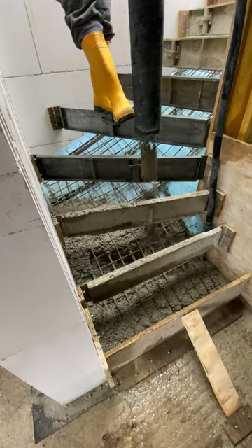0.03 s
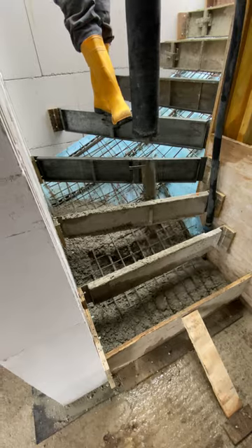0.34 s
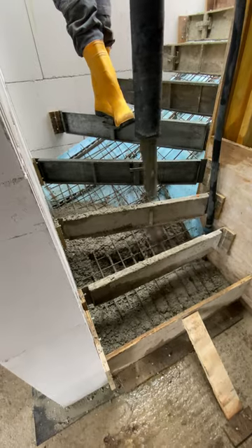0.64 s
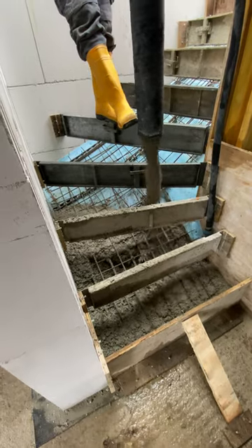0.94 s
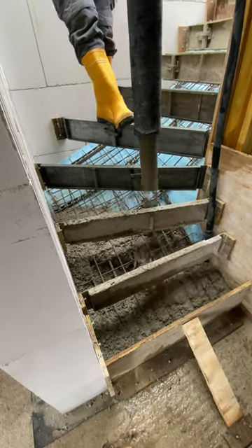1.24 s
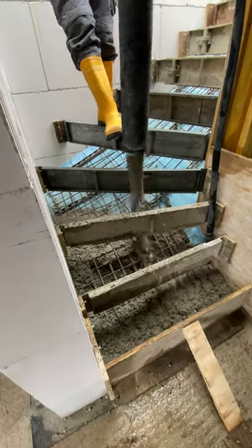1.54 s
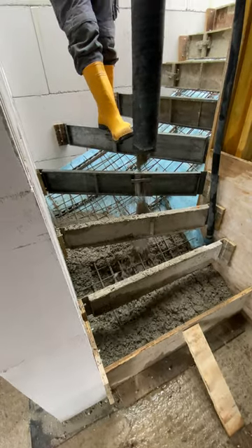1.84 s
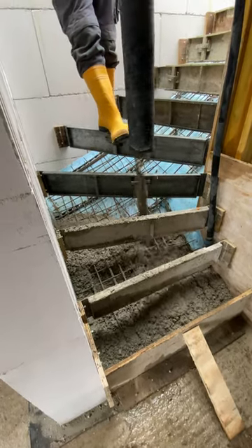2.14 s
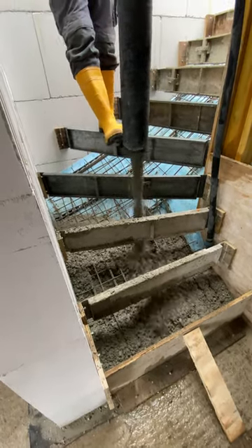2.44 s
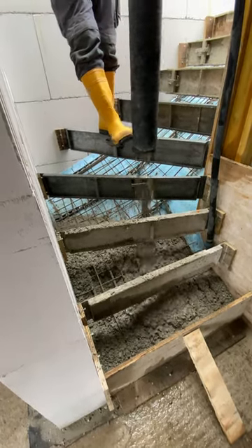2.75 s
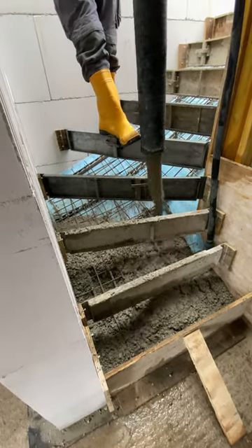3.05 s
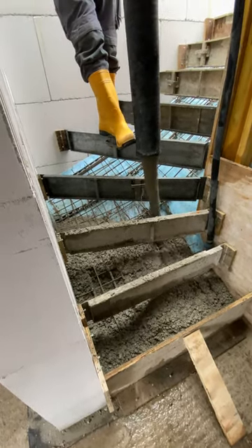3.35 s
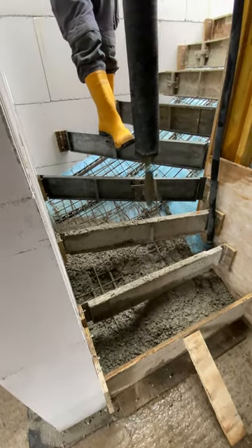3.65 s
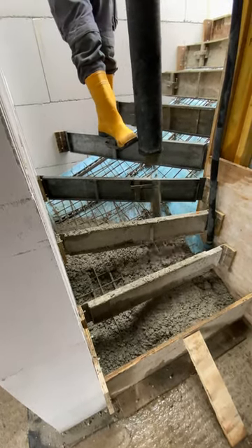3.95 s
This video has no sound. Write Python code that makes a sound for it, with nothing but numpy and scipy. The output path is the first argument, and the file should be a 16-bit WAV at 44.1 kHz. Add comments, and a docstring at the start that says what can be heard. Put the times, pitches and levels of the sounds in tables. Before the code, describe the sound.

Wet concrete pours from a hose throughout, hissing and spattering close by in uneven spurts, with gravel ticking on steel, small squelches and a distant pump drone. Lumps plop from about 0.7 seconds, and a surge lands with a falling gulp at 1.3 seconds. The last heavy lumps drop near 2.1 seconds. The stream continues slightly weaker, faltering briefly around 3.7 seconds.

```python
"""A bare stairwell, two microphones on a hose that shoots wet concrete into a stair's formwork.
From the start the pump's engine drones outside and the stream hisses, spatters, breaks and spurts;
gravel ticks on the mesh, bubbles squelch and rushing air rings the hose. Lumps plop into the fill,
and at 1.3 s the main surge digs in with a falling gulp. The last heavy lumps land near 2.1 s;
the stream runs on a little weaker, with its deepest break just before the end."""
import sys
import numpy as np
from scipy import signal
from scipy.fft import rfft, irfft
from scipy.io import wavfile

SR = 44100
rng = np.random.default_rng(int(sys.argv[2]) if len(sys.argv) > 2 else 0)


def inscribe(sig):
    """Save sig as 16-bit PCM at rate SR to the path in sys.argv[1].

    A 1-D sig is mono; a 2-D sig holds one channel per row.
    Samples are clipped to [-1, 1] before scaling.
    """
    pcm = np.round(np.clip(np.atleast_2d(sig).T, -1, 1) * 32767)
    wavfile.write(sys.argv[1], SR, pcm.astype(np.int16))


N = 176400
TIME_S, BIN_HZ = np.arange(N) / SR, np.arange(N // 2 + 1) * SR / N
SIDES = np.array([[.5], [-.5]])   # left and right microphone


def from_db(db):
    """Decibels to gain."""
    return 10 ** (np.asarray(db) / 20)

def unit_power(x):
    """Scale to unit power."""
    return x / np.sqrt(np.mean(x ** 2) + 1e-20)

def in_time(rows):
    """A curve over time at every sample."""
    return np.interp(TIME_S, *np.transpose(rows))

def per_bin(rows):
    """A curve over log frequency at every spectral bin."""
    hz, value = np.transpose(rows)
    return np.interp(np.log(BIN_HZ + 1e-9), np.log(hz), value)

def colour(white, spectrum):
    """Give a white source its spectrum."""
    return irfft(rfft(white) * from_db(per_bin(spectrum)) * np.sqrt(SR / 2), N)

def drift(per_s, step=40):
    """A smooth random wander with spread 1."""
    pole = np.exp(-2 * np.pi * step * per_s / SR)
    noise = rng.standard_normal(N // step + 2002)
    slow = signal.lfilter([1], [1, -2 * pole, pole * pole], noise)[2000:]
    return np.interp(np.arange(N) / step, np.arange(len(slow)), unit_power(slow))

def grains(per_s, spread_db):
    """Random tiny impacts of uneven size; unit power."""
    sizes = from_db(spread_db * np.minimum(rng.exponential(1, N), 5)) * rng.choice([-1, 1], N)
    return unit_power(sizes * (rng.random(N) < per_s / SR))

def gate(start_s, length_s, edge_s=.0025):
    """1 during an event, with short ramps."""
    return np.clip(np.minimum(TIME_S - start_s, start_s + length_s - TIME_S) / edge_s + .5, 0, 1)

def resonator(hz, t60_s):
    """Feedback coefficients of one damped mode."""
    pole = from_db(-60 / (t60_s * SR))
    return [1, -2 * pole * np.cos(2 * np.pi * hz / SR), pole * pole]

def add_ring(out, start_s, hz, db, cycles, rise, attack_cycles=.86):
    """Mix in a ring that dies by 60 dB over `cycles` while its pitch climbs by the share `rise`."""
    age = np.arange(0, 1, hz / cycles / SR)
    ring = from_db(db - 60 * age) * np.sin(2 * np.pi * cycles * (age + rise * age ** 2 / 2))
    ring *= np.clip(age * cycles / attack_cycles, 0, 1)
    place = out[int(start_s * SR):][:len(ring)]
    place += ring[:len(place)]

def rough_tone(hz, rough, churn_per_s):
    """A resonance shaken by turbulence, its strength and phase churning; unit power."""
    churn = 1 + rough * (drift(churn_per_s) + 1j * drift(churn_per_s))
    return unit_power(np.real(churn * np.exp(2j * np.pi * np.cumsum(hz) / SR)))


# Engine tones from outside: pitch_hz, level_db, wavering_share, wavers_per_s
ENGINE_TONES = [(58.7, -33.5, 0.16, 8.6), (98.9, -43.5, 1, 1.9), (129.1, -45, 0.85, 1.6),
                (218.4, -44, 0.31, 1.9), (237.7, -48.5, 1, 5), (375.6, -50, 0.68, 2.2), (594, -49, 0.88, 3)]
def pump():
    """Farthest off, the engine's firing tone and fainter wavering machine tones."""
    out = 0
    for hz, db, waver, per_s in ENGINE_TONES:
        swing = np.sqrt(2 * (1 - waver ** 2)) + waver * (drift(per_s) + 1j * drift(per_s))
        out += from_db(db) * np.real(swing * np.exp(2j * np.pi * (hz * TIME_S + rng.random())))
    return out

def stairwell(gain, t60_s=.05, reflected_share=.11):
    """An envelope as reflections off the bare walls carry it on."""
    pole = from_db(-120 / (t60_s * SR))
    reflected_power = signal.lfilter([1 - pole], [1, -pole], gain ** 2)
    return np.sqrt((1 - reflected_share) * gain ** 2 + reflected_share * reflected_power)

# Slop in the fill, and the concrete's weight on the boards: time_s, level_db
SLOP_LEVEL = [(0, 0), (.6, -1.5), (.85, 3.5), (1.08, -1.5), (1.19, 5), (1.27, 1.5), (1.36, 4), (1.47, 2),
              (1.57, 0.5), (1.64, 1.5), (1.78, -0.5), (2.08, 1), (2.3, -4), (2.55, -1.5), (3.05, -4),
              (3.6, -4.5), (4, -1.5)]
BOARD_LOAD = [(0, 4.5), (.55, -2.5), (.66, 4), (.8, -4), (1.0, -2.5), (1.3, -5), (1.55, -2), (2.0, -3),
              (2.3, 0.5), (2.7, -7.5), (3.2, -1), (3.65, -7), (3.9, 0), (4, 0)]
# Their spectra: frequency_hz, density_db
SLOP_SPECTRUM = [(100, -73), (200, -65), (300, -61), (400, -59.5), (520, -66.5), (720, -66.5),
                 (1500, -79.5), (4000, -102)]
BOARD_SPECTRUM = [(20, -88), (35, -69), (48, -61.5), (80, -62), (110, -60.5), (170, -58), (250, -62.5),
                  (500, -89.5), (2000, -110)]
def slop():
    """Down in the formwork, soft clots plop into the fill and make the boards rumble."""
    plops = grains(per_s=900, spread_db=2.5) * from_db(in_time(SLOP_LEVEL))
    thuds = grains(per_s=1200, spread_db=.46) * from_db(in_time(BOARD_LOAD))
    return colour(plops, SLOP_SPECTRUM) + colour(thuds, BOARD_SPECTRUM)

# Reinforcing bars: pitch_hz, level_db
BARS = [(2230, -43), (2480, -44), (2570, -39.5), (2715, -40), (2860, -42)]
# Their rattle as the stream wanders over them: time_s, relative_db
BAR_RATTLE = [(0, 4), (.35, 4.5), (.6, -1), (1.05, 6.5), (1.25, 3.5), (1.5, 3), (2.45, 1), (2.65, 2),
              (3.2, -3), (4, -6)]
def rebar(spatter_gain):
    """Stones strike the mud-damped bars; each bar rings briefly."""
    out = 0
    for hz, db in BARS:
        hits = grains(per_s=90, spread_db=1.6) * spatter_gain * from_db(in_time(BAR_RATTLE))
        ring = signal.lfilter([1], resonator(hz, t60_s=.057), hits + 1e-18)
        out += from_db(db) * unit_power(ring)
    return out

# Stones landing on steel: start_s, pitch_hz, level_db
CLINKS = [(.89, 2790, -18), (1.327, 1820, -20), (1.337, 1570, -23), (1.44, 2734, -23), (1.583, 2850, -23),
          (1.774, 1900, -22), (1.851, 2430, -29), (2.102, 2800, -23), (2.555, 1430, -29), (2.95, 2648, -23),
          (3.11, 2500, -21), (3.121, 1970, -24), (3.487, 1430, -27)]
def pebbles(t60_s=.075):
    """Larger stones clink on the steel, damped at once by the mud."""
    out = np.zeros(N)
    for start_s, hz, db in CLINKS:
        add_ring(out, start_s, hz, db, cycles=t60_s * hz, rise=0)
    return out

def squelches(spatter_gain, count=240, base_db=-22, range_db=7, lowest_hz=850, octaves=2.3):
    """Small bubbles burst in the wet mix, louder when more of it lands."""
    out = np.zeros(N)
    for when, pitch, faintness in rng.random((count, 3)):
        db = base_db + 20 * np.log10(spatter_gain[int(when * N)]) - range_db * faintness
        add_ring(out, when * N / SR, lowest_hz * 2 ** (octaves * pitch), db, cycles=55, rise=.11)
    return out

# Swells of the hose's ring: peak_s, length_s, relative_db
HOSE_SWELLS = [(0.09, 0.06, -33), (0.228, 0.089, -31), (.42, 0.058, -31.5), (0.653, 0.11, -34),
               (0.797, 0.049, -26), (0.88, .08, -31.5), (1.022, 0.039, -30), (1.158, .06, -28.5),
               (1.204, 0.055, -29), (1.32, 0.076, -36), (1.403, 0.055, -31), (1.473, 0.045, -29),
               (1.91, 0.041, -30), (2.015, 0.17, -33), (2.086, 0.036, -29.5), (2.291, 0.038, -31.5),
               (2.496, .06, -34), (2.73, 0.074, -39), (3.023, 0.12, -33), (3.204, 0.15, -32),
               (3.494, 0.059, -33), (3.582, 0.057, -29), (3.96, .09, -34.5)]
def hose_ring(pitch_hz=1003.4, waver_hz=16.5, trim_db=-3.5, left_over_right_db=8):
    """Rushing air rings the hose in short, rough, hollow swells, stronger at the left microphone."""
    swells = sum(from_db(db) * np.cos(np.pi * np.clip((TIME_S - peak_s) / length_s, -.5, .5))
                 for peak_s, length_s, db in HOSE_SWELLS)
    tone = rough_tone(pitch_hz + waver_hz * drift(per_s=27.9), rough=.75, churn_per_s=60)
    return swells * tone * from_db(trim_db + left_over_right_db * SIDES)

# Heavy lumps landing in the fill: start_s, pitch_hz, level_db
LANDINGS = [(0.32, 260, -30), (.665, 103, -29), (0.699, 211, -38), (0.748, 114, -19.5), (0.789, 221, -24),
            (.825, 328, -24), (.885, 373, -23), (1.165, 405, -20), (1.201, 330, -22), (1.318, 388, -18),
            (1.386, 348, -38), (1.618, 370, -15), (1.654, 330, -25), (2.04, 760, -18), (2.095, 700, -15)]
def lumps(pockets=5, spread_octaves=.26, scatter_s=.02):
    """Each heavy lump closes a few air pockets that ring with a rising pitch."""
    out = np.zeros(N)
    for start_s, hz, db in LANDINGS:
        pitches_hz = hz * 2 ** (spread_octaves * rng.permutation(np.linspace(-1, 1, pockets)))
        delays_s = scatter_s * (np.arange(pockets) + rng.random(pockets)) / pockets
        pocket_db = db - 10 * np.log10(pockets / 2)
        for pocket_hz, delay_s in zip(pitches_hz, delays_s):
            add_ring(out, start_s + delay_s, pocket_hz, pocket_db, cycles=12, rise=.12)
    return out

# Resonance of the hollow in the fill: time_s, pitch_hz, level_db
GULP_GLIDE = [(1.29, 873, -53), (1.309, 765, -29.5), (1.323, 647, -22.5), (1.338, 595, -34),
              (1.355, 541, -31.5), (1.378, 436, -29), (1.42, 392, -37)]
def gulp():
    """The main surge digs a hollow into the fill; its rough resonance falls as it deepens."""
    times_s, hz, db = np.transpose(GULP_GLIDE)
    tone = rough_tone(np.interp(TIME_S, times_s, hz), rough=.4, churn_per_s=55)
    return tone * from_db(np.interp(TIME_S, times_s, db)) * gate(times_s[0], times_s[-1] - times_s[0])

def gravel(stones_per_s=63, base_db=-29, spread_db=3.6, modes=14):
    """Stones tick on mesh and boards, each with a brief ring."""
    out = 0
    for hz in np.geomspace(1500, 7500, modes):
        hits = rng.random(N) < stones_per_s / modes / SR
        clicks = hits * from_db(base_db + spread_db * rng.standard_normal(N))
        out += signal.lfilter([0, np.sin(2 * np.pi * hz / SR)], resonator(hz, t60_s=.015), clicks + 1e-18)
    return out

# Strength of the stream: time_s, level_db
FLOW_LEVEL = [(0, 2.5), (.45, 0), (.62, 2.5), (.82, 2.5), (1.08, 2.5), (1.28, 3), (1.46, -0.2), (1.7, 1.5),
              (2.05, -0.1), (2.3, -1), (2.5, -1.8), (2.8, -1.5), (3.1, -0.1), (3.35, -2), (3.6, -3),
              (3.8, -3), (3.93, -1.5), (4, -2.6)]
# Instants when it breaks off: end_s, length_s, depth_db
FLOW_BREAKS = [(.183, 0.02, 3.5), (0.305, 0.041, 3), (0.376, 0.022, 3.5), (.491, 0.044, 5.5),
               (0.575, 0.039, 3.5), (0.636, 0.038, 3.5), (0.713, 0.025, 3.5), (0.986, 0.057, 2.5),
               (1.132, .03, 1), (1.513, 0.035, 5), (1.616, 0.022, 2.5), (1.74, 0.05, 2), (1.84, 0.04, 2),
               (1.971, .06, 2.5), (2.709, 0.089, 1.5), (2.884, 0.042, 2), (3.325, 0.063, 1.5),
               (3.734, 0.08, 7.5), (3.783, 0.039, 1.5)]
def flow(surges_per_s=140, surge_db=1.27, decay_s=.0061):
    """Level in dB of the stream leaving the hose, with its breaks and small random surges."""
    kicks = rng.random(N) < surges_per_s / SR
    surges = signal.lfilter([1], [1, -np.exp(-1 / (decay_s * SR))], kicks + 1e-18)
    breaks_db = sum(db * gate(end_s - length_s, length_s) for end_s, length_s, db in FLOW_BREAKS)
    return in_time(FLOW_LEVEL) - breaks_db + surge_db * np.tanh(unit_power(surges - surges.mean()))

# Spurts of air and concrete: start_s, length_s, extra_hiss_db, extra_spatter_db
HOSE_SPURTS = [(0.188, 0.038, 1.5, 3), (0.406, 0.036, 0.5, 4), (1.015, 0.021, 1, 1), (1.171, 0.03, 1.5, 2),
               (1.277, 0.053, 1, 1), (1.843, 0.03, 2.5, 0), (2.06, 0.065, 2.5, -1), (2.194, .03, 2.5, 1.5),
               (2.373, .05, 0.5, 2), (2.948, 0.045, 2, 3), (3.097, 0.04, 0, 2), (3.156, 0.015, 1.5, 3.5),
               (3.351, 0.014, 6, -3), (3.478, 0.033, 1.5, 2), (3.635, .018, -4, 1.5)]
# Stony spatter on top of the flow: time_s, level_db
SPATTER_LEVEL = [(0, -0.2), (.35, -1), (.6, -2), (.82, -0.5), (1.1, -1.2), (1.33, 1.5), (1.45, 1.5),
                 (1.8, -1), (1.95, 0.6), (2.1, 1.5), (2.33, 0.5), (2.41, 2), (2.53, 4.5), (2.66, 0.5),
                 (2.8, 3), (2.95, -2), (3.15, 0), (3.4, 1.5), (4, 1.5)]
def spurting(flow_db, clump_db=.4):
    """Gains of spatter and hiss: both jump in spurts, and the spatter arrives in uneven clumps."""
    hiss_db = flow_db + sum(db * gate(start_s, length_s) for start_s, length_s, db, _ in HOSE_SPURTS)
    spatter_db = flow_db + sum(db * gate(start_s, length_s) for start_s, length_s, _, db in HOSE_SPURTS)
    spatter_db += in_time(SPATTER_LEVEL) + clump_db * drift(per_s=45)
    return from_db(spatter_db), from_db(hiss_db)

# Spectra of landing concrete and escaping air: frequency_hz, density_db
SPATTER_SPECTRUM = [(150, -82), (400, -68.5), (750, -63.5), (1300, -64.5), (2000, -65.7), (2450, -65),
                    (3300, -66), (4100, -69), (6300, -66.5), (9000, -112), (16000, -131)]
HISS_SPECTRUM = [(1000, -85), (2500, -70.5), (4000, -70), (5200, -65.7), (6200, -65), (7600, -67.8),
                 (9200, -67.7), (11300, -70.6), (13000, -70.6), (16000, -77)]
# Hollow resonances of hose and formwork: centre_hz, width_hz, lift_db
CAVITIES = [(2820, 500, 2.2), (6070, 130, 1)]
def stream(spatter_gain, hiss_gain):
    """In the foreground, dense spatter and air hiss, coloured by the hollows, with gravel on top."""
    spatter = colour(grains(per_s=9000, spread_db=2.5) * spatter_gain, SPATTER_SPECTRUM)
    hiss = colour(rng.standard_normal(N) * hiss_gain, HISS_SPECTRUM)
    lift_db = sum(db / (1 + (2 * (BIN_HZ - hz) / width_hz) ** 2) for hz, width_hz, db in CAVITIES)
    return irfft(rfft(spatter + hiss) * from_db(lift_db), N) + gravel() * np.sqrt(spatter_gain)

# Sound common to both microphones: frequency_hz, power_share
MIC_LIKENESS = [(60, .9995), (200, .985), (450, .85), (850, .55), (1200, .62), (1800, .8), (2700, .6),
                (3700, .33), (5000, .42), (6400, .7), (7800, .78), (9200, .99), (10800, .99), (12500, .8),
                (16000, .6)]
# Phase between them: frequency_hz, left_lead_rad
MIC_LEAD = [(50, 0), (700, 0), (1050, -.7), (1500, -.15), (2000, 0), (2600, 1.3), (3900, 1.1), (5000, 3.0),
            (5800, 2.3), (7700, 2.1), (8300, 2.35), (9000, 3.1), (11000, 3.2), (12000, 3.8), (16000, 5.5)]
# Balance between them: frequency_hz, left_over_right_db
MIC_BALANCE = [(100, 0), (380, 1.5), (700, 3), (1000, 2), (1300, -1), (1900, -1), (2350, -3.5), (3000, -1),
               (4400, -2), (6000, -4), (7800, .7), (9500, 0), (16000, 0)]
def scene():
    """Direct sound reaches the two microphones with a lag; each gets its own diffuse stairwell wash."""
    spatter_gain, hiss_gain = spurting(flow())
    sources = (stream(spatter_gain, hiss_gain) + slop() + lumps() + gulp()
               + squelches(spatter_gain) + pebbles() + rebar(spatter_gain) + pump())
    wash = [stream(stairwell(spatter_gain), stairwell(hiss_gain)) + slop() for _ in SIDES]
    likeness = per_bin(MIC_LIKENESS)
    direct = rfft(sources) * np.sqrt(likeness) * np.exp(1j * SIDES * per_bin(MIC_LEAD))
    diffuse = rfft(wash) * np.sqrt(1 - likeness)
    return irfft((direct + diffuse) * from_db(SIDES * per_bin(MIC_BALANCE)), N) + hose_ring()

def record(dry, start_s=.035, low_cut_hz=30, high_cut_hz=15750):
    """The sound cuts in; the deepest bass and the top are cut."""
    cut_in = np.clip((TIME_S - start_s) / .002 + .5, 0, 1)
    low_cut = signal.butter(3, low_cut_hz, "high", fs=SR, output="sos")
    high_cut = signal.ellip(12, .1, 80, high_cut_hz, fs=SR, output="sos")
    return signal.sosfilt(high_cut, signal.sosfilt(low_cut, dry) * cut_in)


dry = scene()
out = record(dry)
inscribe(out)
```